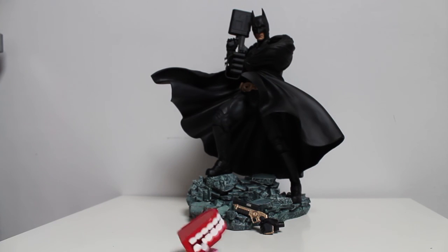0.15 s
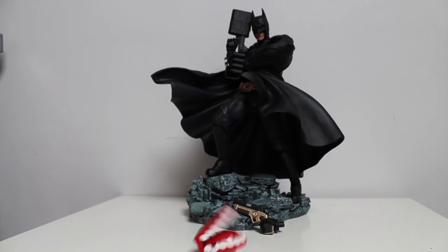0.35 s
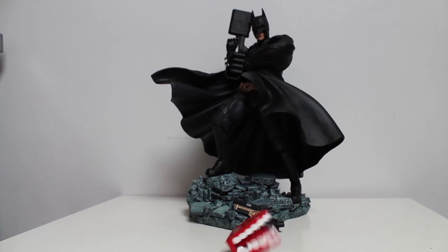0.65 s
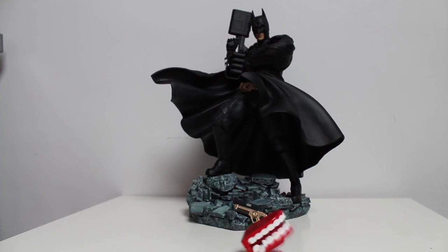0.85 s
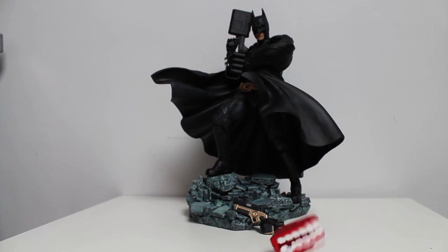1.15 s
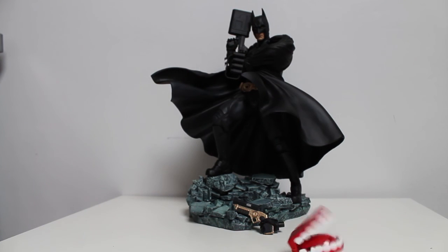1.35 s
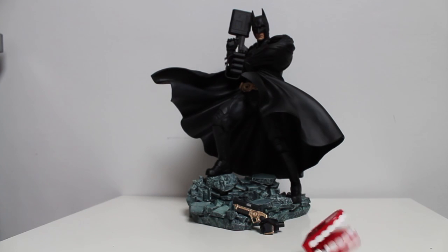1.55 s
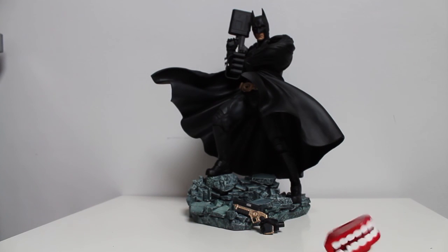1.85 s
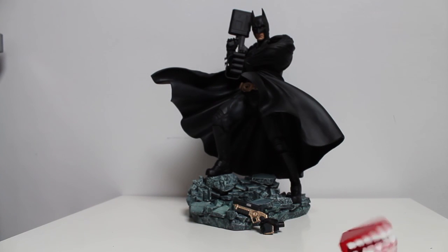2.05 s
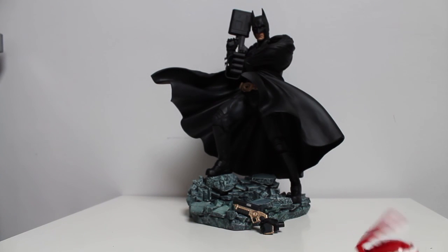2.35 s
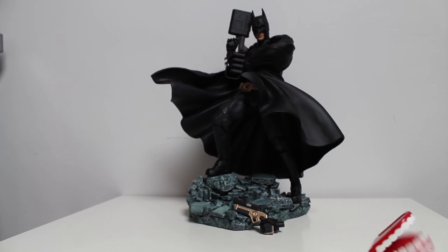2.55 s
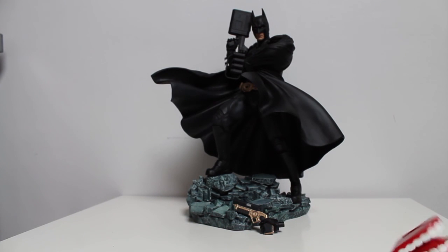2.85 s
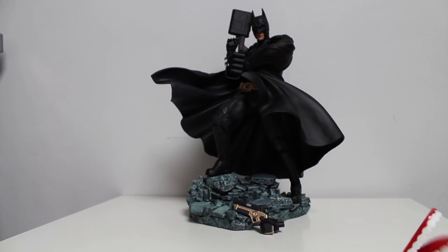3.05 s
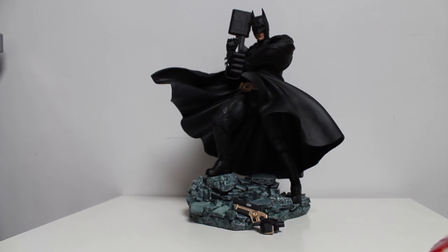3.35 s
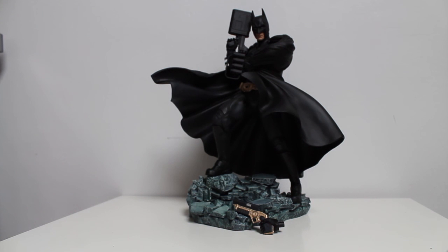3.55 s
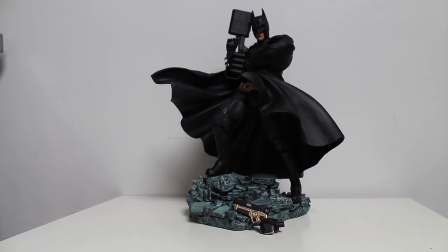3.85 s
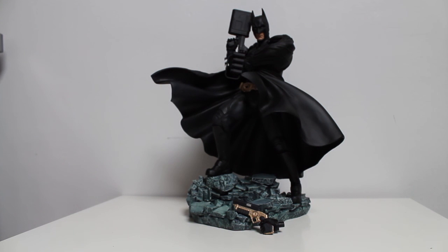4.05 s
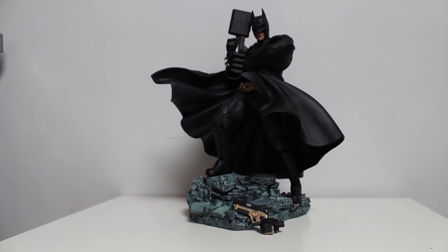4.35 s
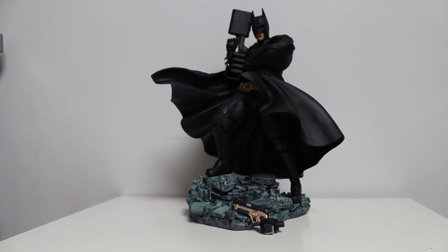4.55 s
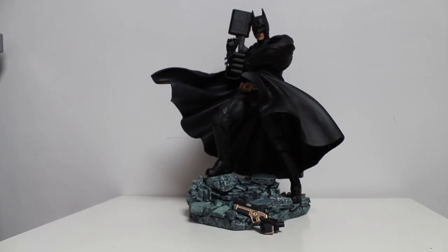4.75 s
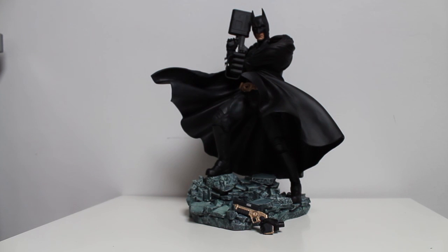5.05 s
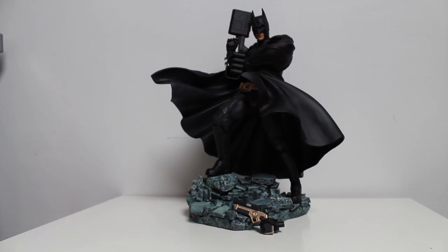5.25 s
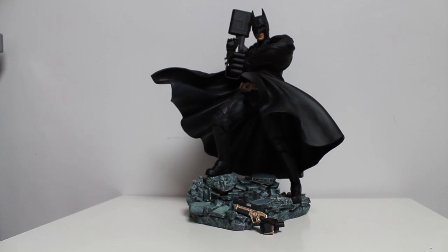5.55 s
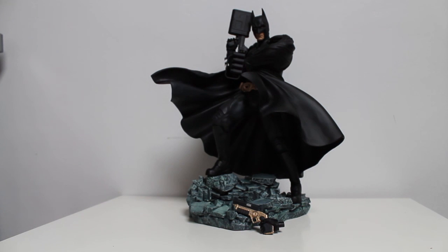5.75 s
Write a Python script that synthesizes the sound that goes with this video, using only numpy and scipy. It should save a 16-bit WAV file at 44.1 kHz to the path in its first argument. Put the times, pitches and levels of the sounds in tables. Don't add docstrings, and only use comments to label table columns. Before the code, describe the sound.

A wind-up set of plastic chattering teeth clacks rapidly across a hard tabletop, stalls twice, then slows to tired, spaced snaps.

```python
import sys
import numpy as np
from scipy import signal
from scipy.fft import rfft, irfft
from scipy.io import wavfile

SR = 44100
rng = np.random.default_rng(int(sys.argv[2]) if len(sys.argv) > 2 else 0)


def linear_from_db(decibels):
    return 10 ** (np.asarray(decibels, float) / 20)


def inscribe(sig):
    pcm = np.round(np.clip(np.atleast_2d(sig).T, -1, 1) * 32767)
    wavfile.write(sys.argv[1], SR, pcm.astype(np.int16))


N = 260631
LEAD = SR // 5

# pitch_hz, level_db, t60_s (time to fade by 60 dB)
JAW_TONES = [(2445, -30, 0.075), (2538, -7, 0.026), (2889, 2.5, 0.0072), (3293, -3, 0.0079),
             (3240, -14, 0.0064), (4180, -11, 0.019), (5042, -6.5, 0.019), (5436, -0.5, 0.0068),
             (6180, -3, 0.019), (7290, -0.5, 0.0034), (7725, 1, 0.0058), (8690, 2, 0.0042),
             (9455, 0, 0.0073), (10400, 1.5, 0.0034), (11320, -11, 0.0096), (12300, 0.5, 0.0046),
             (14500, -8, 0.0078)]
# snap_s, strength_db, cam_tick_before_ms, landing_after_ms, rebound_after_landing_ms
FIRST_HOPS = [(-0.075, -19.5, 20, 26, 40), (0.1339, -29, 28, 28.4, 27), (0.3155, -27, 13.7, 57.4, 42),
              (0.4589, -27, 29, 34.4, 45), (0.5563, -26, 18.6, 55, 21), (0.6791, -25, 24.3, 44, 40),
              (0.7789, -25.5, 26.6, 39, 35), (0.8981, -26, 30, 23.5, 47), (1.0004, -25, 18.1, 50.4, 30),
              (1.125, -24.5, 21, 43, 49), (1.2392, -25.5, 25.3, 25, 40), (1.3437, -24, 21.4, 36.6, 31),
              (1.463, -26, 24.8, 20, 46), (1.5643, -24.5, 18, 48, 34), (1.69, -25, 18.7, 30, 19.4),
              (1.7919, -24.5, 22.8, 31.4, 38), (1.916, -26.5, 24, 25, 33), (2.0154, -25.5, 16, 45, 43),
              (2.1457, -25.5, 21.2, 37, 28.7)]
LATER_HOPS = [(2.4634, -25, 23, 36.5, 46), (2.557, -27, 12.8, 45, 43), (2.6993, -26.5, 23.4, 33, 22),
              (2.7999, -26.5, 24.6, 27, 28), (2.904, -27, 18.7, 32, 24), (3.2175, -26, 17.9, 40, 26),
              (3.3253, -26, 13, 49, 44), (3.4658, -27, 28, 24, 20), (3.5666, -26.5, 9.5, 31.6, 41),
              (3.6935, -26, 15, 37, 32), (3.8102, -26.5, 19.4, 34, 34), (3.9235, -26.5, 18.5, 38, 34),
              (4.0426, -26.5, 16.4, 31, 36), (4.1657, -26.5, 14.4, 39.4, 37), (4.292, -26.5, 18, 26.4, 35),
              (4.4072, -25, 22, 32.6, 31)]
# snap_s, strength_db, jaw_swings_open_after_ms, landing_after_ms, rebound_after_landing_ms
SLOW_TURNS = [
    (2.273, -32, 38.5, 68, 72),
    (3.0281, -33, 38.6, 74.5, 56.5),
    (4.5355, -30.5, 37.5, 76.5, 57),
    (4.7307, -30, 43.5, 79.5, 59),
    (4.9309, -29.5, 35, 72, 56.5),
    (5.124, -32, 35, 73, 56),
    (5.3139, -31.5, 45.5, 79, 56.5),
    (5.5097, -31.5, 43, 81, 56.5),
    (5.711, -32, 41, 73.5, 59.5),
    (5.906, -30.5, 6, 0, 2),
]
TOOTH_GRAZES = [0.1303, 0.4558, 0.8938, 1.2376, 1.461, 1.9125, 3.46]


def at_hz(points, hz):
    table_hz, values = np.transpose(points)
    return np.interp(np.log(hz + 1), np.log(table_hz), values)


def strike(times, levels_db, modes, scatter_db, detune, contact_s, ring_s, pitch=1):
    hz, mode_db, t60 = np.transpose(modes)[:, None, :, None]
    draws = rng.standard_normal((len(times), len(modes), 1, 3))
    scatter, bend, late = np.moveaxis(draws, -1, 0)
    t = np.arange(int(ring_s * SR)) / SR - contact_s * np.abs(late)
    t = np.maximum(t, 0)
    loudness = linear_from_db(mode_db + scatter_db * scatter - 60 * t / t60)
    rings = -loudness * np.sin(2 * np.pi * hz * (pitch + detune * bend) * t)
    hits = linear_from_db(levels_db)[:, None] * rings.sum(1)
    out = np.zeros(LEAD + N + SR)
    starts = LEAD + np.round(times * SR).astype(int)
    for start, hit in zip(starts, hits):
        out[start:start + len(hit)] += hit
    return out[:LEAD + N]


def room_tone():
    # pitch_hz, level_db (per Hz)
    air = [(30, 4), (60, 2), (120, -1), (220, 0), (500, -9), (2000, -16), (8000, -24), (16000, -36)]
    # pitch_hz, level_db (rms)
    hum_tones = [(118.4, -60.5)]
    colour = linear_from_db(at_hz(air, np.fft.rfftfreq(N, 1 / SR)))
    noise = irfft(rfft(rng.standard_normal(N)) * colour, N)
    wander = np.cumsum(rng.standard_normal(N)) * 0.0091
    t = np.arange(N) / SR
    hum = sum(linear_from_db(db + 13.5) * np.sin(2 * np.pi * hz * t + wander) for hz, db in hum_tones)
    return linear_from_db(-50) * noise / noise.std() + hum


def room(x, wet_db, build_s):
    # delay_s, level_db
    echoes = [(0.011, -13), (0.024, -10), (.039, -77)]
    # pitch_hz, t60_s
    tail_t60 = [(200, 1), (1000, 0.36), (3000, 0.31), (7000, 0.28), (15000, 0.26)]
    # pitch_hz, level_db
    tail_colour = [(200, -0.5), (600, -3.5), (1200, -1.3), (3000, -4), (7000, -1.5), (15000, -8)]
    t = np.arange(SR // 2) / SR
    hz = np.fft.rfftfreq(SR // 2, 1 / SR)
    noise = rfft(rng.standard_normal(SR // 2))
    centres = np.geomspace(150, 16000, 12)
    tail = 0
    for k, centre_hz in enumerate(centres):
        share = np.interp(np.log(hz + 1), np.log(centres), np.arange(12) == k)
        fade_db = at_hz(tail_colour, centre_hz) - 60 * t / at_hz(tail_t60, centre_hz)
        tail = tail + irfft(noise * share) * linear_from_db(fade_db)
    tail *= linear_from_db(wet_db) * (1 - np.exp(-(t / build_s) ** 2))
    for delay, echo_db in echoes:
        tail[int(delay * SR)] += linear_from_db(echo_db - 7)
    return signal.fftconvolve(x, tail)[:len(x)]


def contacts():
    to_seconds = [[1], [1], [1000], [1000], [1000]]
    s, _, cam, landing, rebound = np.transpose(FIRST_HOPS + LATER_HOPS) / to_seconds
    quick = dict(cam=s - cam, landing=s + landing, rebound=s + landing + rebound,
                 graze=np.array(TOOTH_GRAZES))
    s, _, swing, landing, rebound = np.transpose(SLOW_TURNS[:-1]) / to_seconds
    rock = s + landing + rebound
    return dict(quick, drop=s + 0.012, slip=s + 0.0195, swing=s + swing,
                slump=s + landing, settle=rock - 0.012, rock=rock)


def blows(levels_db, spread_db):
    at = contacts()
    fall_ms = np.transpose(FIRST_HOPS + LATER_HOPS)[3][:, None]
    times, levels = [], []
    for name, contact_db in levels_db.items():
        db = np.tile(contact_db, (len(at[name]), 1))
        if name == "landing":
            db = db + 0.1221 * (fall_ms - 34.3)
        times.append(at[name])
        levels.append(db)
    db = np.concatenate(levels)
    return np.concatenate(times), (db + spread_db * rng.standard_normal(db.shape)).T


def snaps():
    # time_s, level_db
    bright = [(0, -7), (2.1, -4.5), (2.7, -1.5), (3.9, -1.8), (4.2, -3), (5.9, -2.5)]
    s, strength_db = np.transpose(FIRST_HOPS + LATER_HOPS + SLOW_TURNS)[:2]
    grazed = np.abs(s[:, None] - TOOTH_GRAZES).min(axis=1) < .01
    return s, strength_db, np.interp(s, *np.transpose(bright)) + 3 * grazed


def knocks():
    # pitch_hz, level_db, t60_s
    parts = [
        [(252, -2, 0.11), (465, -4, 0.035)],
        [(633, -6.5, 0.018), (671.6, -1, 0.036), (993, -5.5, 0.032)],
        [(835, -7, 0.026), (1101, -7.5, 0.059), (1292, -2, 0.015), (1390, -1, 0.018)],
    ]
    # tabletop_db, hollow_body_db, base_plate_db
    knock_db = dict(cam=(-4.5, -20.5, -30), landing=(2.3, -19, -22), rebound=(-2, -28.5, -27.5),
                slump=(-0.5, -18.5, -24), rock=(0, -29.5, -23.5), drop=(0, -22.5, -33))
    # time_s, tabletop_db, body_db, base_db
    footing = [(0, -29.5, -2, 0.5), (1.0, -29.5, 0.7, 2.7), (2.0, -31, -1.2, 0.3), (2.9, -35, 0.5, 2.5),
               (3.5, -46, 0, 0.7), (4.3, -51.5, -0.5, 4), (4.8, -37.5, -3, .1), (5.1, -41, -5.5, -6.5),
               (5.9, -35, -11.5, -7)]
    # time_s, pitch_factor
    turning = [(1.5, 1.0), (3.0, 0.99), (4.8, 0.885)]
    # time_s, tabletop_db, hollow_body_db, base_plate_db
    stray = [
        (0.06, -29, -42, -22.5),
        (0.092, -26, -34, -22),
        (0.287, -25, -32, -19),
    ]
    s, levels = blows(knock_db, spread_db=1.5)
    when, *drive_db = np.transpose(footing)
    levels += [np.interp(s, when, db) for db in drive_db]
    s, *levels = np.hstack([[s, *levels], np.transpose(stray)])
    body_pitch = np.interp(s, *np.transpose(turning))[:, None, None]
    manner = dict(scatter_db=1.8, detune=.014, contact_s=0.003, ring_s=.15)
    out = 0
    for db, modes, pitch in zip(levels, parts, (1, body_pitch, 1)):
        out = out + strike(s, db, modes, pitch=pitch, **manner)
    return signal.sosfilt(signal.butter(4, 215, "high", fs=SR, output="sos"), out)


def ticks():
    # pitch_hz, level_db, t60_s
    parts = [
        [(2050, -7, 0.019), (2610, 2.5, 0.023), (3060, 4, 0.01), (3650, 0.5, 0.017)],
        [(3890, 6, 0.0025), (4530, 3.5, 0.0076), (5740, 4.5, 0.0045), (6380, 3, 0.0035), (7160, 8, 0.0029)],
        [(8880, 5.5, 0.014), (9660, 3, 0.0073), (10740, 3, 0.0035), (12650, 13.5, 0.0015), (15100, -2, 0.0035)],
    ]
    # shell_db, teeth_db, sharp_edge_db
    tick_db = dict(cam=(-23, -13, -24.5), graze=(-25, -21, -20), landing=(-30, -32, -36),
               rebound=(-31, -26, -30), slip=(-48, -25, -44), swing=(-33, -16, -23),
               slump=(-20, -20.5, -30), settle=(-37, -46, -50), rock=(-26, -23.5, -29.5))
    # time_s, level_db
    spring = [(0, 0.4), (1.5, -1.6), (3.0, -1.8), (4.4, -3.1), (5.0, -3.7), (5.9, -2)]
    # time_s, shell_db,
    # teeth_db, sharp_edge_db
    stray = [(0.0593, -19, -18, -22.5), (0.0881, -19, -20, -21), (0.1523, -28, -18, -18),
             (0.161, -27, -16, -22), (0.1724, -18, -34, -34), (0.1796, -36, -12, -26),
             (0.1934, -41, -36, -19), (0.2334, -14, -11.5, -18), (0.26, -33, -29, -29),
             (0.2847, -24.5, -22, -22), (0.3963, -34, -31, -38), (2.958, -24, -34, -28),
             (3.5077, -22, -30, -28), (3.9633, -22, -24, -31)]
    s, levels = blows(tick_db, spread_db=1.5)
    levels += np.interp(s, *np.transpose(spring))
    s, *levels = np.hstack([[s, *levels], np.transpose(stray)])
    manner = dict(scatter_db=2, detune=.03, contact_s=.0003, ring_s=.02)
    out = 0
    for delay, bounce_db in [(0, -1.5), (.0018, -6), (.0041, -11)]:   # seconds, dB
        for db, modes in zip(levels, parts):
            out = out + strike(s + delay, db + bounce_db, modes, **manner)
    return signal.sosfilt(signal.butter(2, 1200, "high", fs=SR, output="sos"), out)


def rattle():
    s, strength_db, _ = snaps()
    wait, size = np.moveaxis(rng.random((len(s), 16, 2)), -1, 0)
    times = s[:, None] + 0.0039 + 0.041 * wait
    levels_db = strength_db[:, None] + 1.5 + 8 * size - 7 * wait
    shiver = strike(times.ravel(), levels_db.ravel(), JAW_TONES,
                    scatter_db=2, detune=.015, contact_s=.0003, ring_s=.025)
    return signal.sosfilt(signal.butter(4, 2050, "high", fs=SR, output="sos"), shiver)


def jaws():
    # delay_s, level_db
    rebounds = [
        (.0012, -16),
        (.0023, -10),
        (.003, -12),
    ]
    s, strength_db, bright_db = snaps()
    hard = dict(scatter_db=1.2, detune=.012, contact_s=.00002, ring_s=.02)
    low = strike(s, strength_db + 26.0, JAW_TONES[:4], **hard)
    high = strike(s, strength_db + bright_db + 28.5, JAW_TONES[4:], **hard)
    for delay, rebound_db in rebounds:
        high += strike(s + delay, strength_db + 30.5 + rebound_db, JAW_TONES[5:10], **hard)
    return signal.sosfilt(signal.butter(4, 1700, "high", fs=SR, output="sos"), low + high)


def scene():
    # time_s, treble_db
    shade = [(0, 0.5), (2.0, -1.8), (4.3, -1), (5.0, -6), (5.9, -7)]
    toy = jaws() + rattle() + ticks() + knocks()
    spots = 12
    place = np.linspace(0, spots - 1, len(toy))
    wet = 0
    for k in range(spots):
        nearness = np.cos(np.pi / 2 * np.clip(place - k, -1, 1))
        wet = wet + room(toy * nearness, wet_db=-31.5, build_s=0.0013)
    heard = (toy + wet)[LEAD:]
    dull = signal.sosfilt(signal.butter(1, 8500, fs=SR, output="sos"), heard)
    treble_db = np.interp(np.arange(N) / SR, *np.transpose(shade))
    heard = dull + linear_from_db(treble_db) * (heard - dull)
    return (heard + room_tone())[None]


def gain_control(x, limit_db, release_s, attack_s):
    fading = np.arange(N) / SR / release_s
    over = np.maximum(20 * np.log10(np.abs(x) + 1e-9) - limit_db, 1e-3)
    held = np.exp(np.maximum.accumulate(np.log(over) + fading, axis=-1) - fading)
    r = np.exp(-1 / (attack_s * SR))
    return x * linear_from_db(-signal.lfilter([1 - r], [1, -r], held))


def band_limit(x):
    return signal.sosfilt(signal.butter(12, 16820, fs=SR, output="sos"), x)


def record(dry):
    x = signal.sosfilt(signal.butter(2, 200, "high", fs=SR, output="sos"), dry)
    x = gain_control(x, limit_db=2.0, release_s=0.018, attack_s=0.0021)
    ceiling = .72
    x = x / (1 + np.abs(x / ceiling) ** 6) ** (1 / 6)
    x = signal.sosfilt(signal.cheby2(8, 30, 16600, fs=SR, output="sos"), x)
    return band_limit(x)


dry = scene()
out = record(dry)
inscribe(out)
```